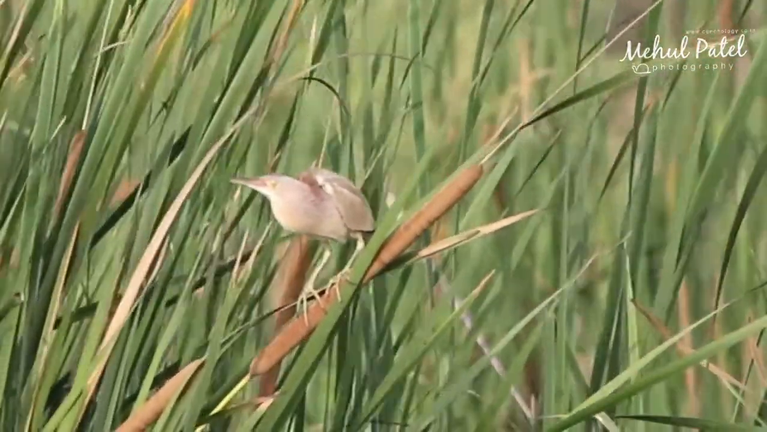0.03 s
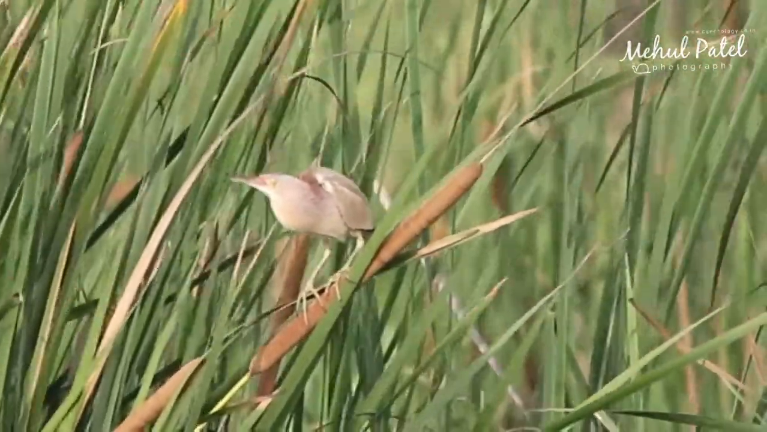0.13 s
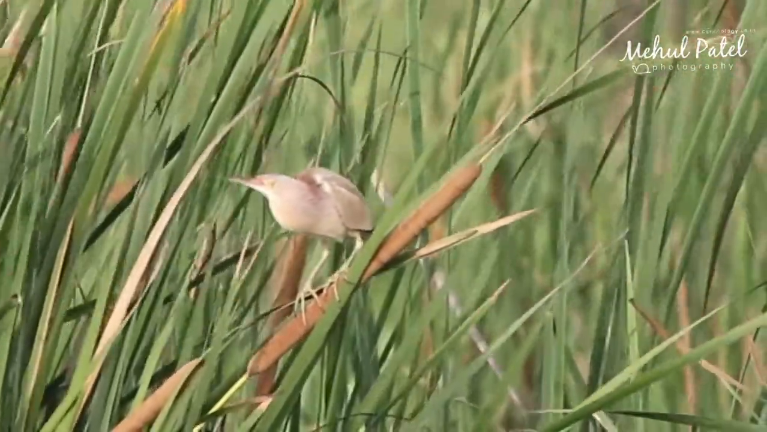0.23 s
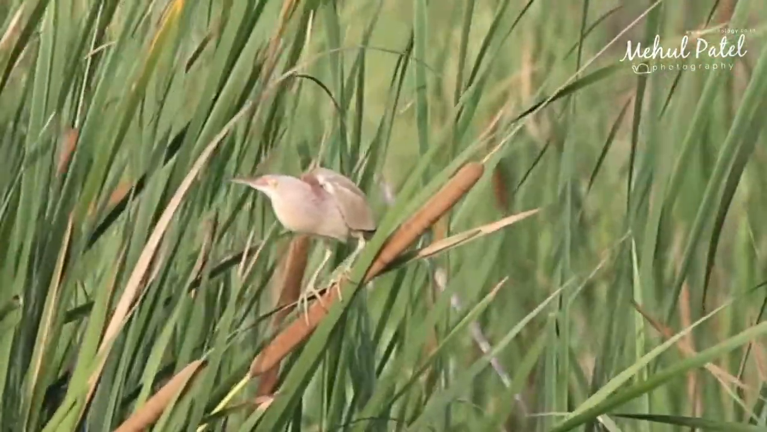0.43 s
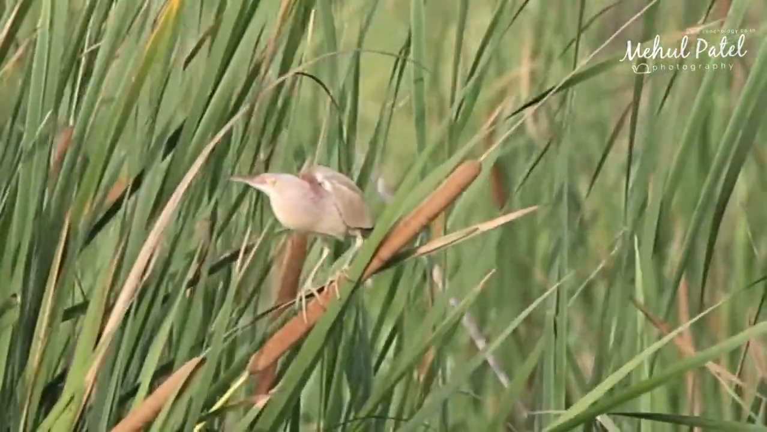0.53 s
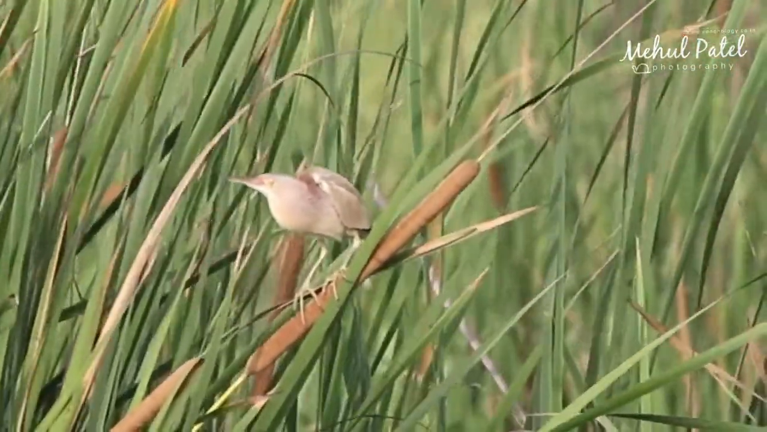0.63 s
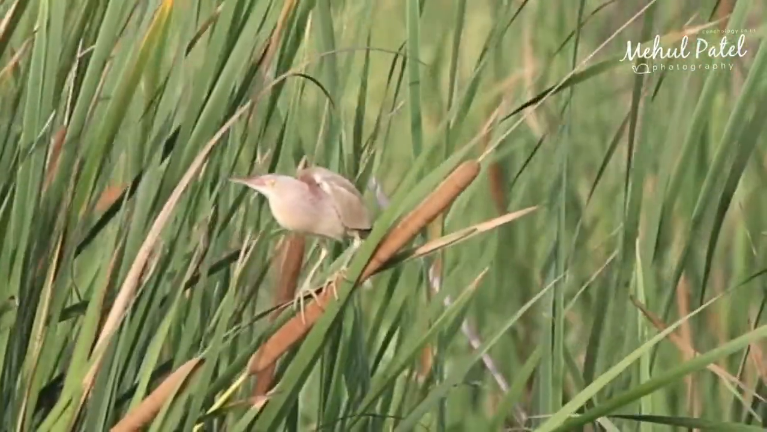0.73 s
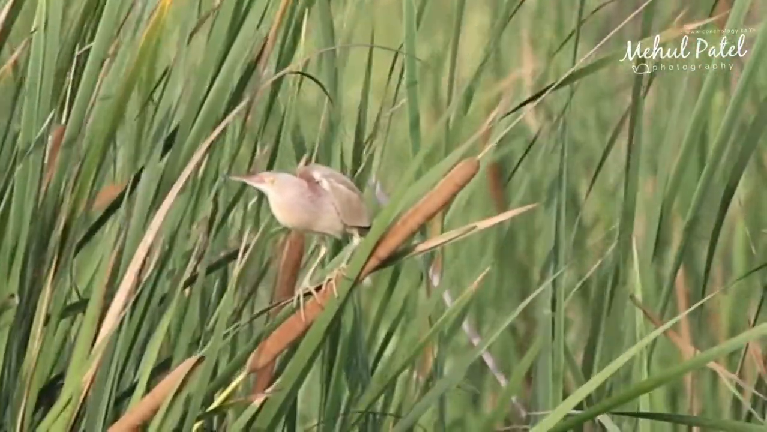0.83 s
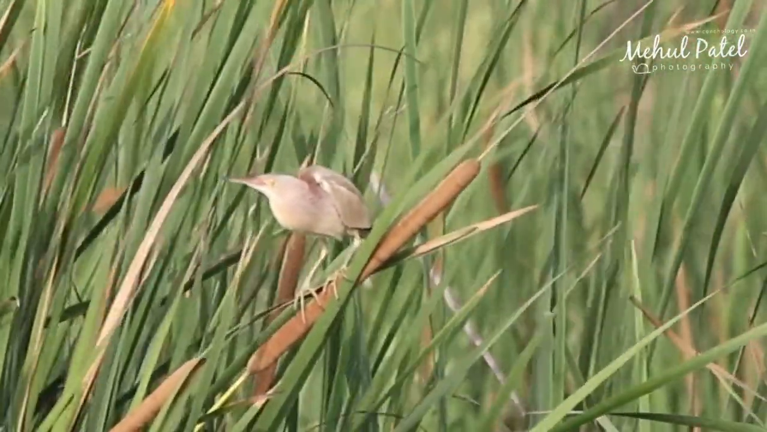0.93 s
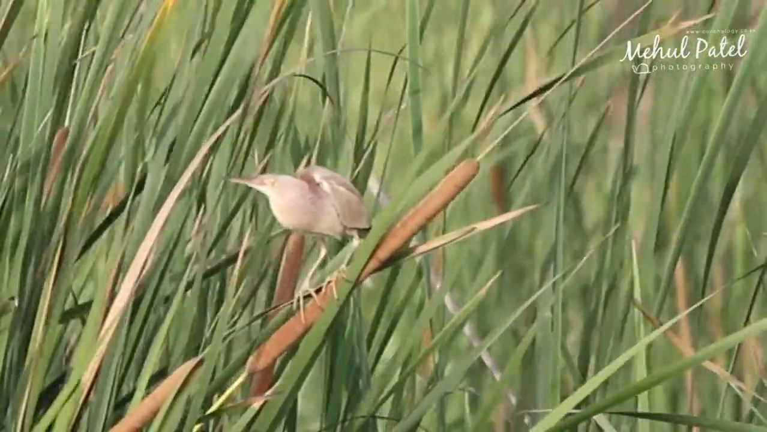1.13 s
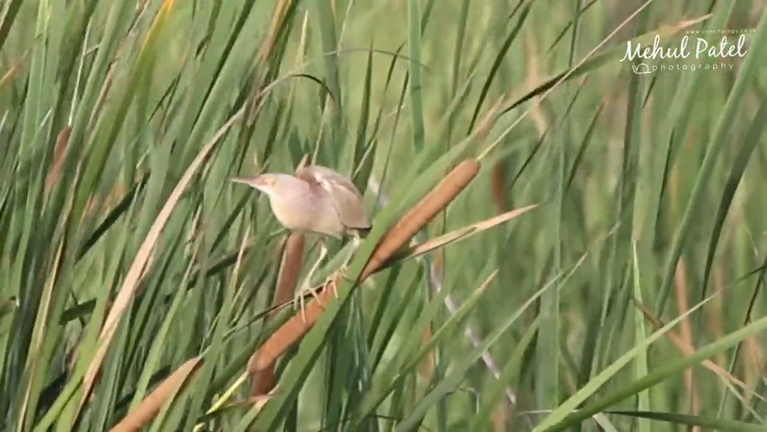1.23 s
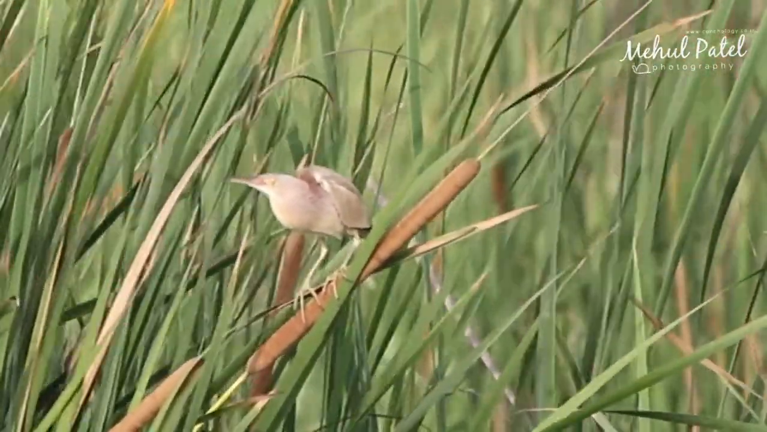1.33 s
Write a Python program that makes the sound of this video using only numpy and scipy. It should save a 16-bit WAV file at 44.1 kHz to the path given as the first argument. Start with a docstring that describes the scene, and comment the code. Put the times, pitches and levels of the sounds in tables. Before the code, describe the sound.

Wind buffets the microphone while far birds and insects chirp faintly in softly hissing reeds.

```python
"""Wind rumbles on the microphone, buffets harder, mostly at its left port, and dies away.
Eddies push the air at the ports to and fro. Behind the wind a reed bed hisses and faint far tones hum.
Distant birds whistle and rasp; the stems scatter and echo the whistles.
Three insects chirp in steady rhythms, each chirp a run of strokes on a wing resonance."""
import sys
import numpy as np
from scipy import signal
from scipy.io import wavfile
from scipy.ndimage import uniform_filter1d

SR = 44100
rng = np.random.default_rng(int(sys.argv[2]) if len(sys.argv) > 2 else 0)


def materialize(psi):
    """Save the field psi as 16-bit PCM at rate SR to the path in sys.argv[1].

    A 1-D psi becomes a single channel; in a 2-D psi each row is a channel.
    """
    bounded = np.clip(np.atleast_2d(psi).T, -1, 1)
    quanta = np.round(bounded * 32767).astype(np.int16)
    wavfile.write(sys.argv[1], SR, quanta)


N = 61739
T = np.arange(N) / SR


def from_db(db):
    """Decibels to gain."""
    return 10 ** (np.asarray(db) / 20)


def unit_rms(x):
    """Scale to rms 1."""
    return x / np.sqrt(np.mean(x ** 2) + 1e-20)


def log_lookup(curve, x):
    """Interpolate (x, y) points on a log x axis."""
    xs, ys = np.transpose(curve)
    return np.interp(np.log(x), np.log(xs), ys)


def pan_gains(pan_db):
    """Constant-power gains; pan is left minus right."""
    gains = from_db(np.array([[.5], [-.5]]) * pan_db)
    return gains / np.sqrt(np.mean(gains ** 2, axis=0))


def drift(knots_per_s):
    """Random wander, rms 1."""
    knots = rng.standard_normal(1200)
    return unit_rms(np.interp(T * knots_per_s, np.arange(len(knots)), knots))


def band_noise(low_hz, high_hz, correlation, order=3):
    """Stereo noise band, rms 1, with a set left-right correlation."""
    sos = signal.butter(order, [low_hz, min(high_hz, SR * .45)], "band", fs=SR, output="sos")
    mid, side = signal.sosfilt(sos, rng.standard_normal((2, N + SR // 4)))[:, -N:]
    correlation = np.clip(correlation, -.98, .98)
    return unit_rms(np.sqrt(1 + correlation) * mid + np.sqrt(1 - correlation) * side * [[1], [-1]])


def from_the_left(x, lag_s=.000225):
    """Sound from the left reaches the right port later."""
    return np.array([x[0], np.interp(T - lag_s, T, x[1])])


# Buffets: (peak time [s], half-power length [s], relative level [dB], rumble centre [Hz], pan [dB],
# swing share of power [0-1])
WIND_BUFFETS = [ (.01, 0.043, -30, 86.3, -2.5, 0.23), (0.136, 0.061, -37.5, 120.8, -2, 0.4),
                (0.219, 0.0089, -23.5, 99.4, 9, 0.93), (0.262, 0.022, -19.5, 102.6, 15, 0.92),
                (0.372, 0.11, -28.5, 104, 8, 0.33), (0.365, 0.023, -19, 102.9, 21, 0.7),
                (0.444, 0.021, -24.5, 115.6, 7.5, 0.7), (0.474, 0.017, -16.5, 104.9, 7.5, 0.56),
                (0.501, .025, -25, 79.5, 4, 0.67), (0.539, 0.032, -15, 129.6, 18, 0.41),
                (0.583, 0.026, -28.5, 100.4, 5.5, 0.18), (0.637, 0.031, -17, 107.4, -7.5, 0.42),
                (0.69, 0.022, -21, 121.4, 16, 0.34), (0.758, 0.055, -18.5, 98.9, 8, 0.36),
                (.828, 0.033, -15, 130.6, 10, 0.64), (0.853, .018, -11.5, 158.4, 7.5, 0.41),
                (0.876, 0.014, -16.5, 110.1, 7.5, 0.53), (0.947, 0.031, -17.5, 141.7, 10.5, 0.56),
                (0.977, 0.018, -16, 151.5, 11, 0.5), (0.999, 0.017, -11, 158.3, 12, 0.35),
                (1.031, 0.02, -16, 150.5, 7.5, 0.43), (1.07, 0.027, -40, 124.5, -1, .3),
                (1.127, 0.012, -18, 142.9, 12, 0.26), (1.15, 0.019, -27, 129.5, 8.5, 0.51),
                (1.218, 0.032, -40.5, 115.3, 3, 0.36), (1.265, 0.025, -32, 79.7, 7, 0.32)]


def buffets(lull_db=-44, steepness=2.57):
    """Buffets swell and fade over a lull; the strongest dominates centre, pan and swing share."""
    peak_s, length_s, db, *traits = np.transpose(WIND_BUFFETS)
    offset = (T - peak_s[:, None]) / length_s[:, None]
    power = from_db(db)[:, None] ** 2 * .5 ** (np.abs(2 * offset) ** steepness)
    lull = from_db(lull_db) ** 2
    total = power.sum(0) + lull
    blended = [(trait @ power + lull * np.median(trait)) / total for trait in traits]
    return np.sqrt(total), *blended


# Eddy spectrum: (frequency / rumble centre [ratio], relative density [dB])
EDDY_SPECTRUM = [(.2, -25), (.4, -9.5), (.7, -1.5), (1, -5.5), (1.4, -8), (2, -11.5), (3, -26.5),
                 (4.5, -35.5), (9, -78)]


def wind(gain_db=.5, smooth_s=.042, wander=.1442, port_slip_rad=.45):
    """Eddies push the air at the ports to and fro: a tight swing amid rough rumble."""
    strength, centre_hz, pan_db, swing_share = buffets()
    edges_hz = 20 * 2 ** np.arange(0, 6.6, .5)
    rumble = 0
    for low, high in zip(edges_hz, edges_hz[1:]):
        ratio = np.sqrt(low * high) / centre_hz
        gain = np.sqrt(high - low) * from_db(log_lookup(EDDY_SPECTRUM, ratio))
        sides = pan_gains(pan_db * np.minimum(ratio, 1.3))  # large eddies cover both ports
        rumble += band_noise(low, high, correlation=.29) * gain * sides
    power = uniform_filter1d(np.mean(rumble ** 2, axis=0), int(smooth_s * SR))
    power = uniform_filter1d(power, int(smooth_s * SR / 2))
    rumble /= np.sqrt(power + 1e-12)
    swing_hz = centre_hz * np.exp(wander * drift(110))
    cycles = np.cumsum(swing_hz) / SR + rng.random()
    slip_rad = port_slip_rad * np.array([drift(16), drift(26.3)])
    swing = np.sqrt(2) * np.sin(2 * np.pi * cycles + slip_rad) * pan_gains(pan_db)
    mix = np.sqrt(1 - swing_share) * rumble + np.sqrt(swing_share) * swing
    return mix * strength * from_db(gain_db)


# Reeds and far surroundings: (frequency [Hz], relative density [dB])
REED_SPECTRUM = [(25, -20), (55, 2.5), (110, 4), (170, -1), (240, -15.5), (320, -4), (450, -12), (620, -14),
                 (800, -10), (960, -18), (1500, -17.5), (2200, -19), (4000, -21.5), (6300, -27),
                 (8000, -18), (9000, -24), (9700, -30.5), (15500, -36)]
# Their stereo image: (frequency [Hz], left-right correlation [0-1])
REED_CORRELATION = [(50, 0.85), (300, 0.8), (700, 0.19), (1200, 1), (2500, 0.19), (5000, 0.27),
                    (9000, 0.076), (14000, 0.13)]


def reeds(level_db=-38, flicker_db=1.5):
    """Wide, steady hiss over a far rumble; each band flickers."""
    edges_hz = np.r_[22, 45, 90, 140, 200 * 2 ** np.arange(0, 6.6, .25)]
    out = 0
    for low, high in zip(edges_hz, edges_hz[1:]):
        hz = np.sqrt(low * high)
        band = band_noise(low, high, log_lookup(REED_CORRELATION, hz))
        density_db = log_lookup(REED_SPECTRUM, hz) + flicker_db * drift(24.82)
        out += band * np.sqrt(high - low) * from_db(density_db)
    return from_db(level_db) * unit_rms(out)


# Far hums: (pitch [Hz], width [Hz], level [dB])
FAR_HUMS = [(317.3, 31.4, -53), (780.3, 60, -58.5)]


def hums():
    """Narrow, wavering tones from far away."""
    return sum(band_noise(hz - width_hz / 2, hz + width_hz / 2, correlation=.43, order=2) * from_db(db)
               for hz, width_hz, db in FAR_HUMS)


# Bird notes: (onset [s], length [s], start pitch [Hz], bend at 1/3 [Hz], at 2/3 [Hz], at end [Hz],
# level [dB], pan [dB], scattered share [0-1], echo send [dB])
BIRD_NOTES = [ (-.008, 0.027, 2394, 195, 400, 450, -42.5, 0, 0.38, -5),
              (.012, 0.1, 4143, 702.5, 220, -120, -39.5, -21, 0.017, -1.5),
              (.046, 0.035, 6316, 184, 128, 502, -47, -22, 0.24, -12),
              (.134, 0.067, 2280, -440, -400, -44, -42.5, -21, 0.014, -2.5),
              (.164, 0.044, 5200, 189, 24, 132, -42, 7, .04, -1),
              (0.172, 0.097, 2433, -48.5, -150, -330, -44.5, 5.5, .5, -4.5),
              (.238, .085, 2380, -720, -740, -700, -49.5, -26, 0.016, -3),
              (0.241, 0.038, 3130, -89, -260, -370, -42.5, 6, 0.25, -2),
              (.311, 0.039, 3137, -87, -290, -370, -42.5, 9.5, 0.31, -8),
              (0.325, 0.088, 3967, -120, -100, -200, -47.5, -35, 0, -4),
              (0.466, 0.067, 2004, 34, 35, -220, -51, 0, .25, -14),
              (.911, .017, 7817, 296.5, 594, 700.5, -41, -13, 0.094, -0.5),
              (1.1, 0.031, 3190, -78.5, -230, -350, -43, 7, 0.45, -6),
              (1.157, 0.035, 3125, -70, -280, -330, -41, 7, 0.29, -14),
              (1.277, .032, 4065, 151, 160, 171, -41.5, 7, 0.087, -12),
              (1.308, .029, 5310, 20, 21, 55, -48.5, 9, 0.28, -4),
              (1.34, 0.036, 3633, -220, -230, -200, -45.5, 3.5, 0.012, -10),
              (1.364, .02, 4370, 15, 23, 1, -47.5, 5, 0, -7)]


def bird_whistles(edge_s=.0068, waver_hz=22.4, fade_db_per_s=59, flutter_db=1.2):
    """Gliding, fading near-sines, part scattered nearby, part echoed across the marsh."""
    out, echo_send = np.zeros((2, N)), np.zeros((2, N))
    for onset_s, length_s, start_hz, *bends_hz, db, pan_db, scatter, echo_db in BIRD_NOTES:
        progress = np.clip((T - onset_s) / length_s, 0, 1)
        glide = np.polyfit(np.linspace(0, 1, 4), [0, *bends_hz], 3)
        hz = start_hz + np.polyval(glide, progress) + waver_hz * drift(400)
        tone = np.sqrt(2) * np.sin(2 * np.pi * np.cumsum(hz) / SR)
        to_edge_s = np.minimum(progress, 1 - progress) * length_s
        envelope = np.sin(np.pi / 2 * np.minimum(to_edge_s / edge_s, 1))
        level_db = db - fade_db_per_s * progress * length_s + flutter_db * drift(89.8)
        note = tone * envelope * from_db(level_db)
        note = np.sqrt(1 - scatter) * note + np.sqrt(scatter) * stem_scatter(note)
        note *= pan_gains(pan_db)
        out += from_the_left(note) if pan_db > 0 else note
        echo_send += from_db(echo_db) * note
    return out + marsh_echo(echo_send)


def stem_scatter(note, first_s=.0044, last_s=.023):
    """Early reflections off nearby stems blur a note at equal power."""
    delay_s = T[:int(last_s * SR)]
    noise = rng.standard_normal((2, SR // 8))[:, :len(delay_s)]
    reflections = noise * (delay_s > first_s) * (1 - delay_s / last_s)
    return unit_rms(signal.fftconvolve(note[None], reflections, axes=1)[:, :N]) * note.std()


def marsh_echo(x, t60_s=.93, rise_s=.02):
    """Countless stems scatter sound back, differently on each side."""
    envelope = from_db(-60 * T / t60_s) * np.minimum(T / rise_s, 1)
    tail = unit_rms(rng.standard_normal((2, N)) * envelope) / np.sqrt(N)
    return signal.fftconvolve(x.mean(0)[None], tail, axes=1)[:, :N]


# Wings: (pitch [Hz], width [Hz], stroke rate [Hz], level at start [dB], midway [dB], at end [dB],
# pan [dB])
INSECT_WINGS = [(7373, 157, 126, -53, -51, -43.5, -2), (7900, 830, 128, -46.5, -57.5, -54, -24),
                (8930, 250, 127, -64, -49.5, -46.5, -4)]
# Chirp timing per insect: (end of first chirp [s], period [s])
CHIRP_TIMING = [(.054, .0898), (.062, .0878), (.111, .109)]


def insects(swell_db=27, release_s=.005, stroke_depth=.22):
    """Quick strokes on a narrow wing resonance; each chirp swells, then stops short."""
    out = 0
    for insect, (first_end_s, period_s) in zip(INSECT_WINGS, CHIRP_TIMING):
        hz, width_hz, stroke_hz, *levels_db, pan_db = insect
        to_end_s = (first_end_s - T) % period_s
        chirp = from_db(-swell_db * (to_end_s / period_s) ** 2) * np.minimum(to_end_s / release_s, 1)
        strokes = unit_rms(1 + stroke_depth * np.cos(2 * np.pi * stroke_hz * to_end_s))
        wing = band_noise(hz - width_hz / 2, hz + width_hz / 2, correlation=.32, order=2)
        wing /= np.sqrt(uniform_filter1d(wing ** 2, size=400) + 1e-9)  # even out the level
        level_db = np.interp(T, np.linspace(0, T[-1], len(levels_db)), levels_db)
        out += wing * chirp * strokes * from_db(level_db) * pan_gains(pan_db)
    return out


# Hoarse calls: (onset [s], hold [s], t60 [s], centre [Hz], width [Hz], level [dB], pan [dB])
HOARSE_CALLS = [(0.09, 0.1, 0.94, 4270, 750, -48.5, -4), (.165, 0.13, 0.88, 5680, 2030, -49, 5),
                (0.591, 0.058, 0.1, 4150, 2830, -50, -7), (0.759, 0.12, 0.64, 5530, 1514, -49, 0.5),
                (1.375, 0.035, 0.81, 5230, 1890, -46, 7)]


def bird_rasps(attack_s=.0074):
    """Hoarse calls blurred by distance: noise bands with attack, hold and tail."""
    out = 0
    for onset_s, hold_s, t60_s, hz, width_hz, db, pan_db in HOARSE_CALLS:
        attack = np.clip((T - onset_s) / attack_s, 0, 1)
        decay = from_db(-60 * np.maximum(T - onset_s - hold_s, 0) / t60_s)
        band = band_noise(hz - width_hz / 2, hz + width_hz / 2, correlation=.091)
        out += band * attack * decay * from_db(db) * pan_gains(pan_db)
    return out


def scene():
    """Wind in front; reeds, birds, insects and hums behind."""
    return wind() + from_the_left(reeds() + bird_rasps()) + bird_whistles() + insects() + hums()


def record(dry):
    """Deep bass rolled off, top cut steeply."""
    low_cut_hz, high_cut_hz = 27.5, 15500
    highpass = signal.butter(2, low_cut_hz, "high", fs=SR, output="sos")
    lowpass = signal.ellip(12, .1, 90, high_cut_hz, fs=SR, output="sos")
    return signal.sosfilt(lowpass, signal.sosfilt(highpass, dry))


dry = scene()
out = record(dry)
materialize(out)
```